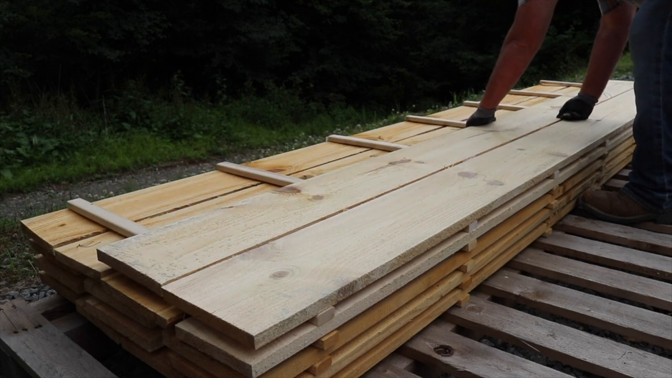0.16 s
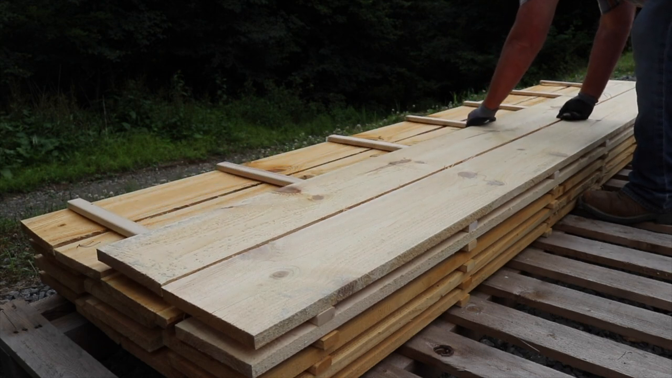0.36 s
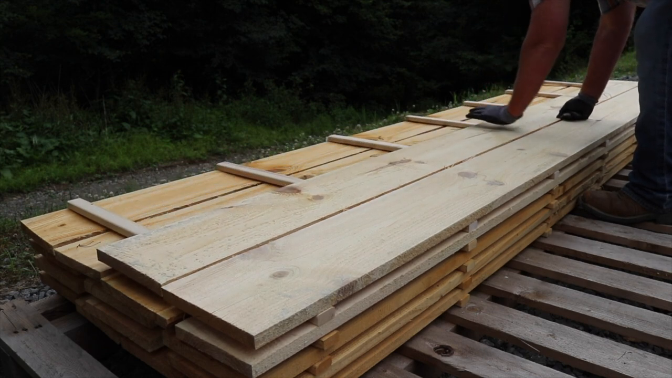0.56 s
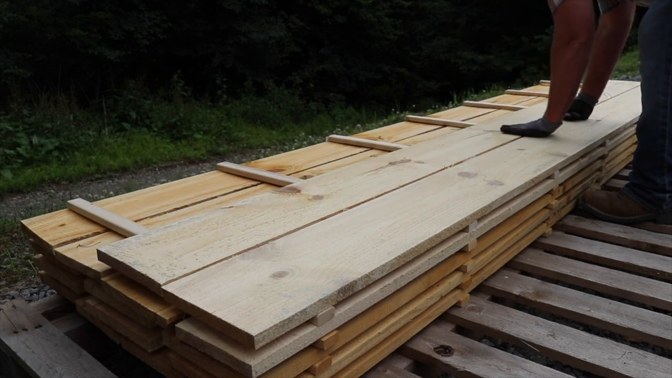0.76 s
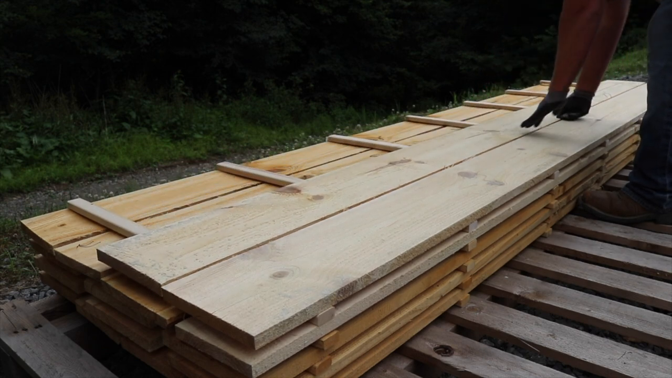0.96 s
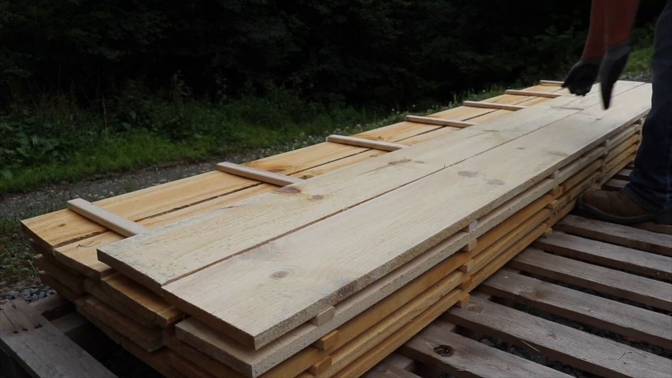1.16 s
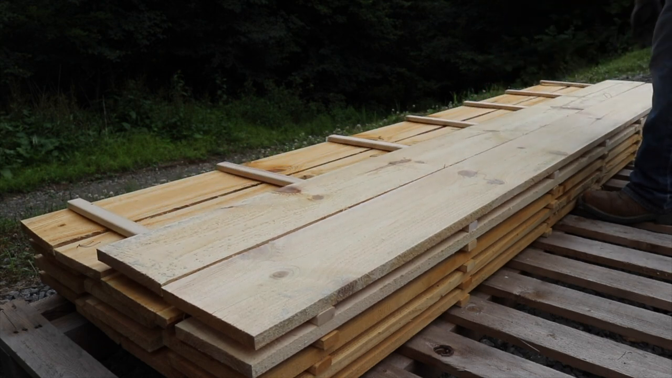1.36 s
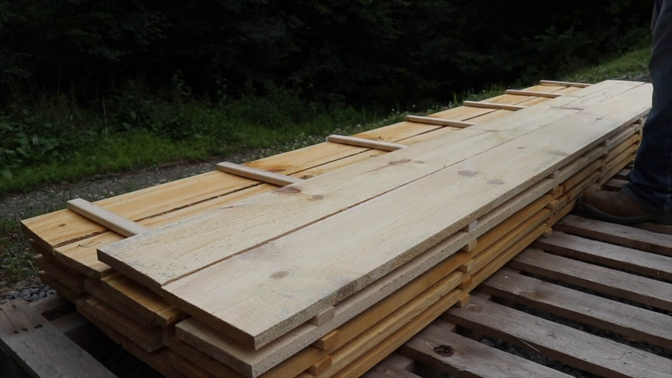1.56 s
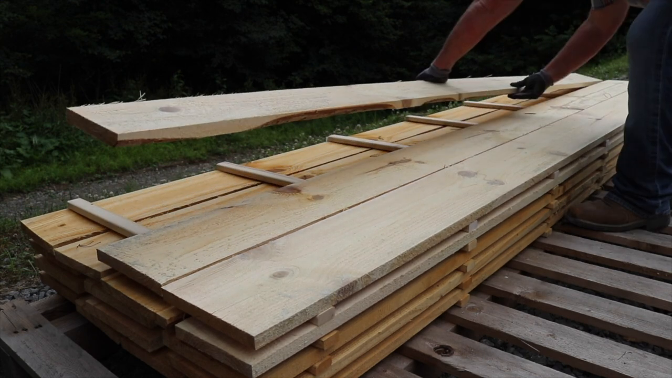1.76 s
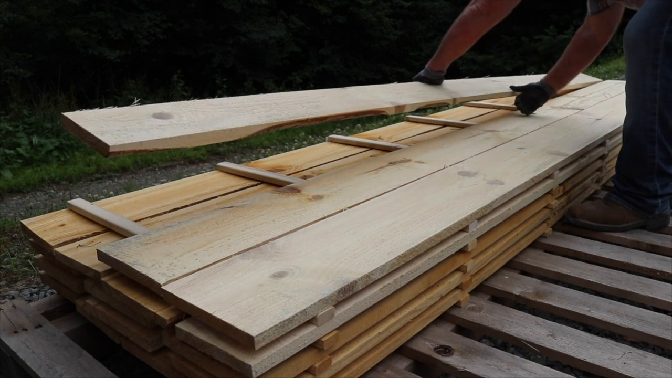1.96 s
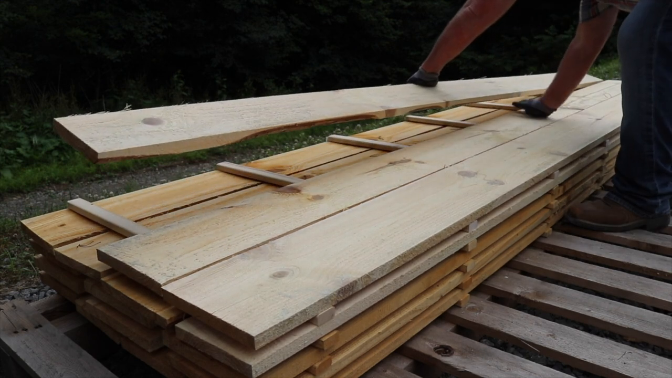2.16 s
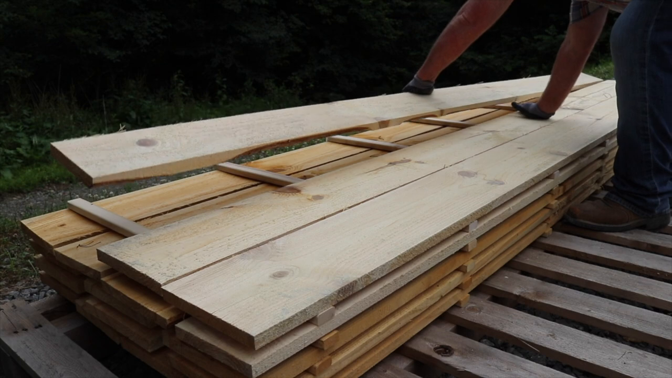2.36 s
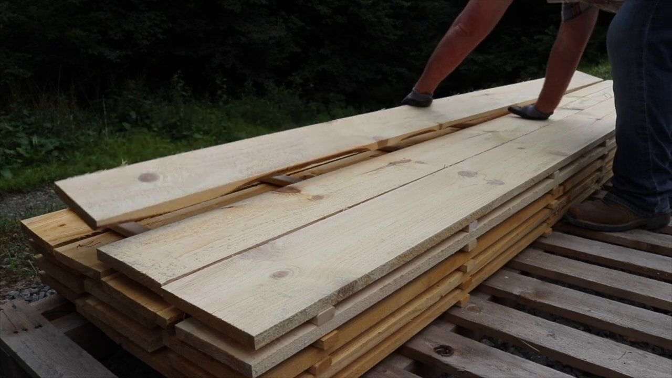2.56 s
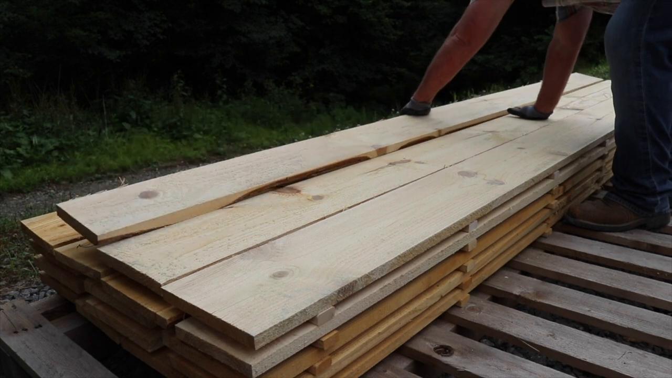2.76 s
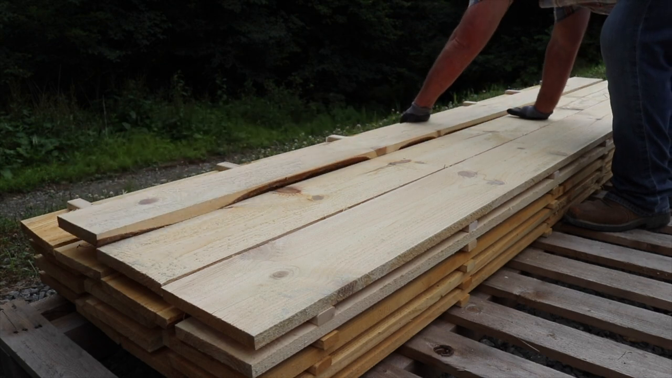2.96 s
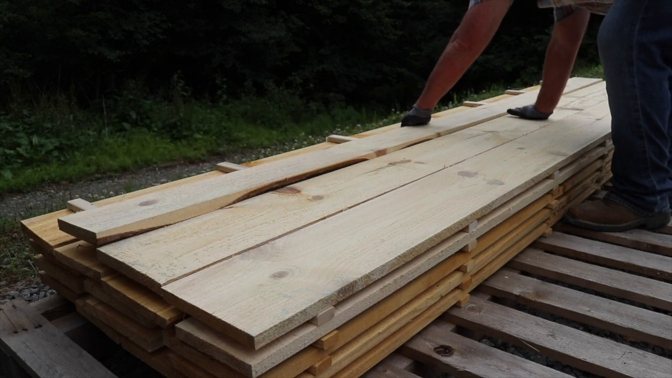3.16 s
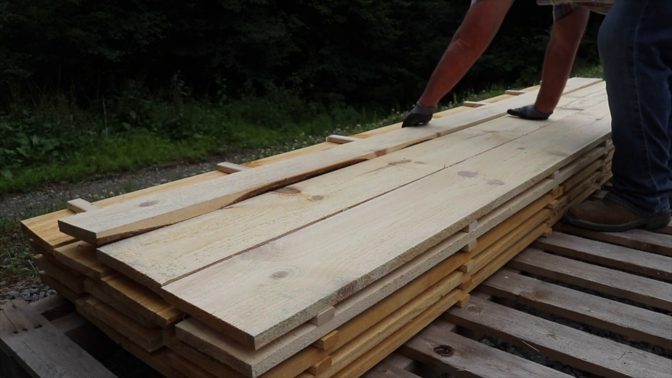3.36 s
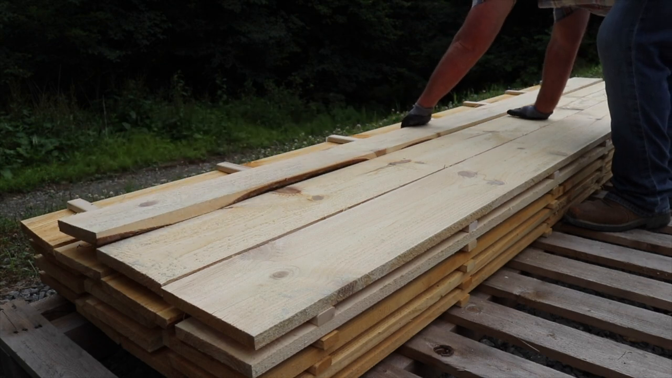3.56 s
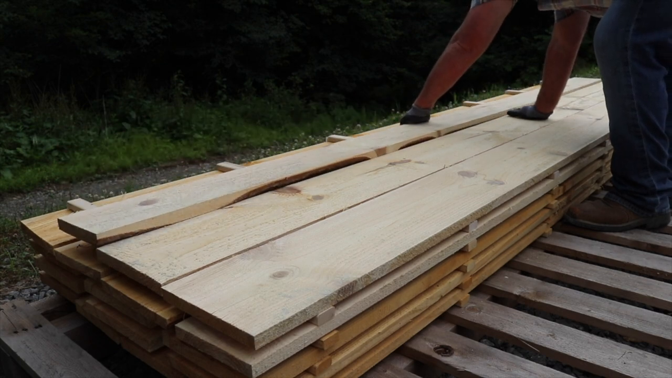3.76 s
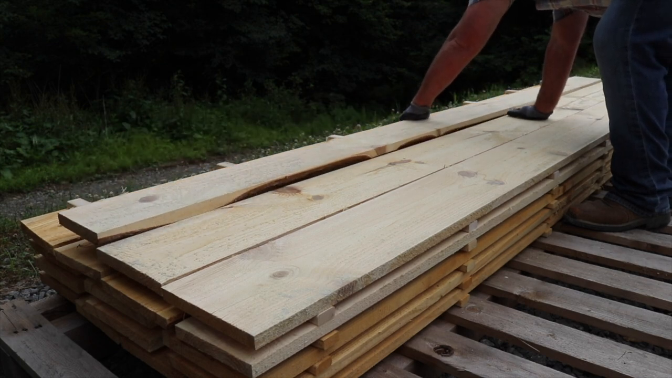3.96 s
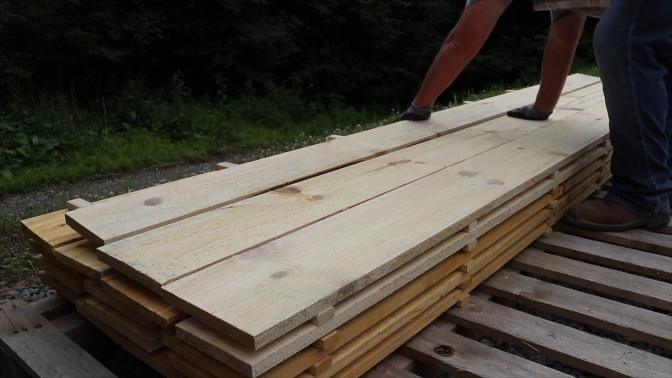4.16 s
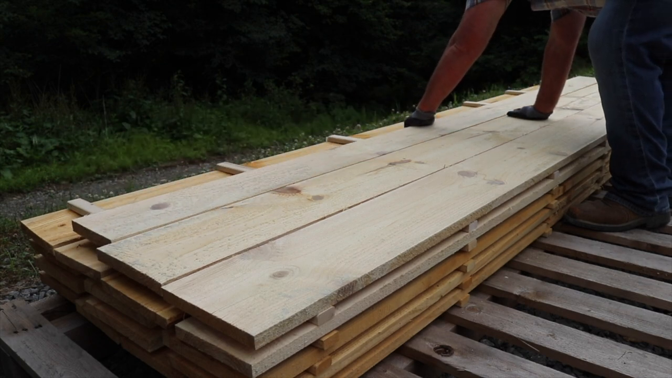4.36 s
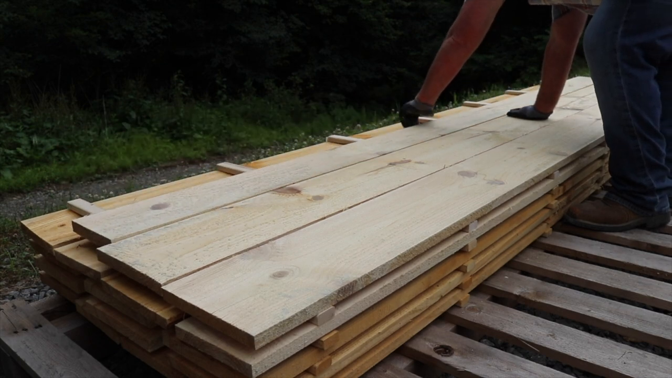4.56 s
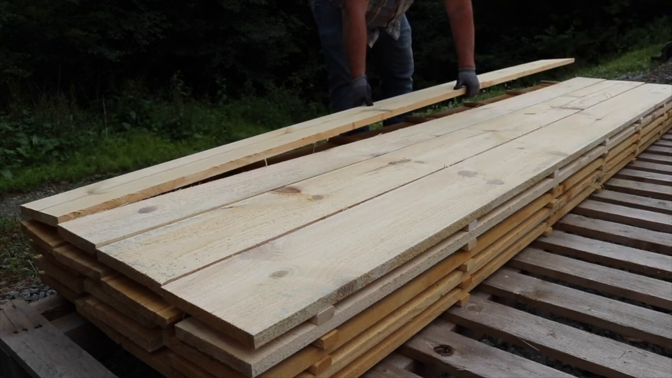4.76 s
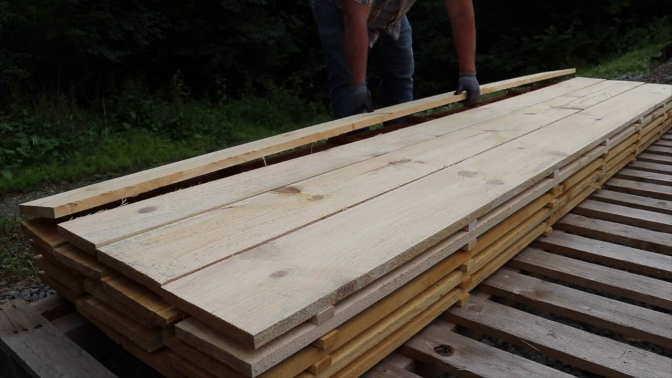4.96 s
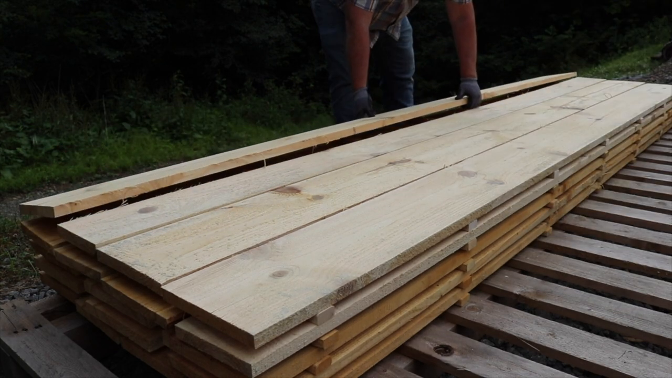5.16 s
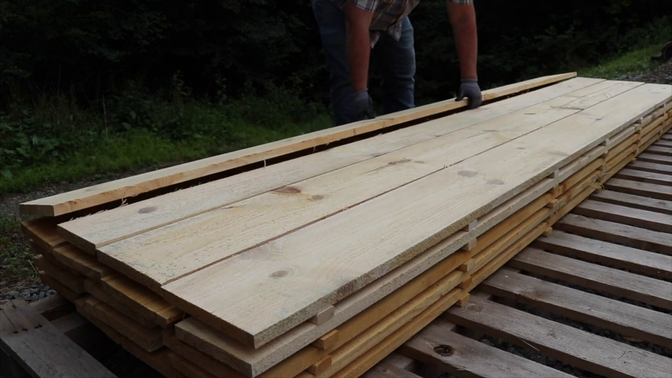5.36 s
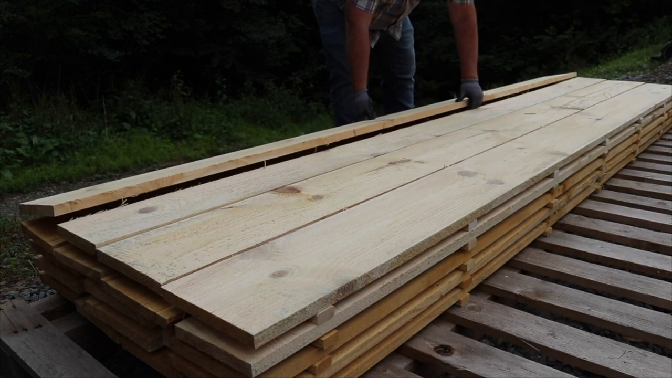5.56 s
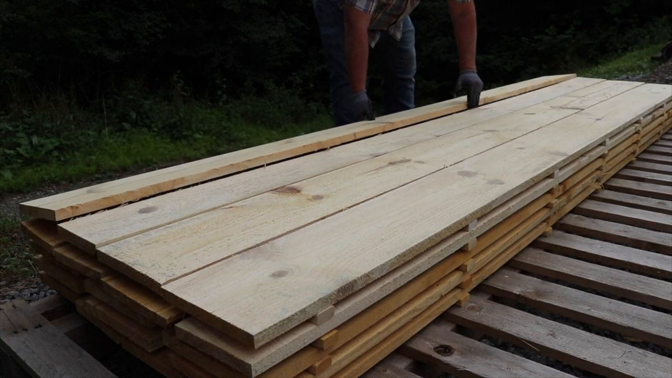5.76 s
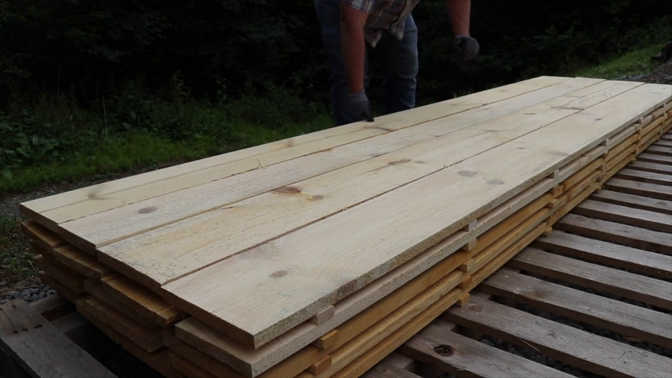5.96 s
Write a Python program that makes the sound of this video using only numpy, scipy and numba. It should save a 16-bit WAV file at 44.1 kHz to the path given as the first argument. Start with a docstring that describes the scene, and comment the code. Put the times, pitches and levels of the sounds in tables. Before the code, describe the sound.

Planks thud and scrape onto a wood stack, the last slapping down loudly, over a faint low hum and distant bird.

```python
"""Outdoors at a lumber pile, a stereo microphone pair facing the stack. Sawn boards are laid on it:
gloves brush the wood, a plank thuds onto the spacer strips, ticks and scrapes as it is pushed home,
and a last narrow board drops flat with a loud clack that makes the recorder's gain control duck.
Each blow rings the modes of board and stack; each scrape is wood fibres catching and slipping.
Far off in the trees a bird sings, and a distant hum wavers over the low rumble of the air."""
import sys
import numpy as np
from scipy import signal
from scipy.fft import rfft, irfft, next_fast_len
from scipy.io import wavfile
from scipy.ndimage import uniform_filter1d
from numba import njit

SR = 44100
rng = np.random.default_rng(int(sys.argv[2]) if len(sys.argv) > 2 else 0)


def transcribe(signal):
    """Save signal, clipped to [-1, 1], as a 16-bit WAV file at the path in sys.argv[1]."""
    frames = np.atleast_2d(signal).T
    limited = np.clip(frames, -1, 1)
    pcm = np.round(limited * 32767).astype(np.int16)
    wavfile.write(sys.argv[1], SR, pcm)


N = 265108
TIME = np.arange(N) / SR


# Board hits board, centre front (time [s], strength [dB], band bottom [Hz], bandwidth [Hz],
# ring time [factor], crack level [dB], bending-wave travel time at 1 kHz [s])
CLACKS = [(5.1015, -10, 830, 580, 0.52, -20.5, 0.0042), (5.721, -45, 890, 3570, 0.56, -20.5, 0.0011),
          (5.77, -15, 600, 1570, 0.18, -43, 0.00061), (5.848, 1, 715, 870, 0.4, -17.5, 0.0038),
          (5.909, 18.5, 153, 2750, 1.17, -2.5, .00052), (5.9205, 19, 700, 810, 0.69, -44, 0.00089)]
def clacks(stack_db=-17):
    """A hard contact cracks and rings the loose board far more than the stack."""
    out = np.zeros(N)
    for s, db, low_hz, width_hz, ring_scale, crack_db, travel_s in CLACKS:
        add(out, s, strike(db + stack_db, db, [low_hz, low_hz + width_hz], ring_scale, travel_s))
        add(out, s + travel_s, crack(crack_db))
    return out


# A plank comes down on the stack (time [s], thud strength [dB], thud band top [Hz],
# knock strength [dB], knock band centre [Hz], knock lag [s], skid level [dB])
LANDINGS = [(1.556, -37, 400, -24.5, 467, 0.0026, -51), (1.668, -22, 296, -12.5, 490, 0.0008, -41),
            (2.714, -10.5, 455, -16.5, 754, .004, -38), (4.209, -10, 1120, -3, 807, .009, -36),
            (4.37, -17, 267, -23.5, 710, 0.0021, -47), (5.107, -21, 501, -14.5, 500, 0.0016, -52)]
def landings(plank_db=-8.5, travel_s=.00098, knock_octaves=.58, bounce_s=.05, bounce_db=-15.5):
    """The stack thuds; the plank knocks as it falls flat, skids a little, sags and hits once more."""
    out, half_band = np.zeros(N), 2 ** (knock_octaves / 2)
    for s, thud_db, top_hz, knock_db, knock_hz, lag_s, skid_db in LANDINGS:
        force_db = 20 * np.log10(np.hypot(undb(thud_db), undb(knock_db)))
        thud = (0, thud_db, [152, top_hz])
        knock = (lag_s, knock_db, [knock_hz / half_band, knock_hz * half_band])
        bounce = (bounce_s, force_db + bounce_db, [140, 318])
        for after_s, db, band_hz in (thud, knock, bounce):
            add(out, s + after_s, strike(db, db + plank_db, band_hz, ring_scale=1, travel_s=travel_s))
        add(out, s + travel_s, crack(thud_db - 23.5))
        skid_speed = touch(attack_s=.0078, length_s=.095)
        add(out, s, stroke(skid_speed, skid_db, tilt_db=-3.5, rasp_hz=1880))
    return out


# Modes of the stack, struck through a plank (frequency [Hz], level [dB], t60 [s])
STACK_MODES = [(96, -14, .2), (148, -8, .2), (166, -6, .22), (199, 0, .2), (240, -4, .12), (277, -3, .14),
               (333, 0, .13), (388, -2, .12), (449, -5, .12), (500, -8, .1), (586, -8, .1), (637, -3, .1),
               (734, -4, .08), (777, -8, .09), (837, -9, .08), (934, 0, .06), (1181, -2, .05),
               (1380, -8, .06)]
# Modes of the loose board (frequency [Hz], level [dB], t60 [s])
BOARD_MODES = [(357, -18, .1), (490, -14, .09), (689, -3, .08), (853, -8, .08), (972, -7, .08),
               (1127, -2, .07), (1262, -7, .055), (1342, -7, .06), (1430, -3, .06), (1659, 1, .055),
               (1860, -5, .045), (1935, -2, .045), (2170, -9, .045), (2430, -15, .04), (2660, -11, .04),
               (2900, -11, .035), (3500, -17, .03)]
def strike(stack_db, board_db, band_hz, ring_scale, travel_s, mode_db=-12, clatter_db=2):
    """One contact rings board and stack; its place and softness choose the band that rings."""
    t = np.arange(SR // 2) / SR
    stack = undb(stack_db) * ring(STACK_MODES, t, ring_scale)
    board = undb(board_db) * ring(BOARD_MODES, t, ring_scale)
    weak_modes = (undb(stack_db) + .33 * undb(board_db)) * clatter(t, ring_scale)
    wood = cut(undb(mode_db) * (stack + board) + undb(clatter_db) * weak_modes, band_hz, "band")
    # bending waves speed up with the root of frequency, so the treble arrives first
    return shape(wood, lambda f: np.exp(-4j * np.pi * travel_s * np.sqrt(1000 * f)))


def ring(modes, t, ring_scale):
    """Decaying modes, met with a slightly different strength by each blow."""
    hz, db, t60 = np.transpose(modes)[:, :, None]
    polarity = (-1) ** np.arange(len(modes))[:, None]
    gain = polarity * undb(db + rng.standard_normal(hz.shape))
    decay = undb(-60 * t / (t60 * ring_scale))
    return np.sum(gain * decay * np.sin(2 * np.pi * hz * t), axis=0)


# The stack's crowd of weak modes, by octave (centre [Hz], level [dB], t60 [s])
CLATTER_BANDS = [(150, -21, .17), (300, -22, .14), (600, -26, .12), (1200, -24, .1), (2400, -20, .065),
                 (4800, -23, .045)]
def clatter(t, ring_scale):
    """Modes too dense to tell apart; the treble dies first."""
    out = np.zeros(len(t))
    for hz, db, t60 in CLATTER_BANDS:
        octave = band_noise(len(t), [hz / np.sqrt(2), hz * np.sqrt(2)])
        out += undb(db - 60 * t / (t60 * ring_scale)) * octave
    return out


# Spectrum of wood slapping wood (frequency [Hz], level [dB])
CRACK_COLOUR = [(300, 10.5), (1500, 16.5), (3200, 3.5), (5500, -2), (8000, -16), (11000, -13), (16000, -44)]
def crack(db, decay_s=.003):
    """The short burst of two hard faces meeting."""
    t = np.arange(SR // 10) / SR
    burst = colour(rng.standard_normal(len(t)), CRACK_COLOUR) * np.exp(-t / decay_s)
    return undb(db) * cut(burst, 70, "high")


# Dry wood catching and letting go (time [s], level [dB], pitch [Hz])
TICKS = [(2.087, -47, 3700), (2.232, -38, 1560), (2.241, -37.5, 2200), (2.288, -30, 1980),
         (2.355, -43.5, 1630), (2.962, -31, 1854), (3.503, -28.5, 1870), (3.881, -41.5, 1260),
         (3.894, -40.5, 1940), (4.701, -46.5, 1850)]
def ticks(rise_cycles=3.52, echo_s=.0069, echo_db=-13, tail_db=-17, tail_s=.024):
    """A few cycles of one wood resonance with a snap, a rustle and a reflection; loud ticks are purer."""
    out, t = np.zeros(N), np.arange(SR // 10) / SR
    for s, db, hz in TICKS:
        age = t * hz / rise_cycles
        swell = age ** 2 * np.exp(2 - 2 * age)
        noise = band_noise(len(t), [hz / 2, hz * 1.07])
        tone = undb(db) * swell * np.sin(2 * np.pi * hz * t)
        snap = undb(-29.5 + .38 * db) * swell * noise
        rustle = undb(db + tail_db) * np.exp(-t / tail_s) * noise
        tick = tone + snap + rustle
        add(out, s, tick)
        add(out, s + echo_s, undb(echo_db) * tick)
    return out


def splinter(at_s=1.5657, snap_db=-31, band_hz=(2800, 7000), snap_s=.0012, tear_db=-23, tear_s=.033):
    """A splinter snaps and tears as the plank is lifted."""
    out, t = np.zeros(N), np.arange(SR // 5) / SR
    envelope = np.exp(-t / snap_s) + undb(tear_db) * np.exp(-t / tear_s)
    add(out, at_s, undb(snap_db) * envelope * band_noise(len(t), band_hz, order=1))
    return out


# Shoves along the stack (time of top speed [s], run-up [s], level [dB], tilt [dB/octave], rasp [Hz])
PUSHES = [(.447, .19, -36, -1.6, 2140), (3.305, 0.14, -52, 0, 1800), (4.355, 0.12, -39.5, -0.5, 1400),
          (4.584, 0.13, -34.5, -0.7, 2600), (5.768, 0.09, -33, -2, 1720), (5.868, .06, -26.5, -0.8, 1900)]
def pushes(run_up_power=1.66, stop_s=.039):
    """A board pushed over rough-sawn wood gathers speed and stops dead."""
    out = np.zeros(N)
    for s, run_s, db, tilt_db, rasp_hz in PUSHES:
        t = np.arange(-run_s, stop_s, 1 / SR)
        run_up = np.minimum(1 + t / run_s, 1) ** run_up_power
        brake = np.cos(np.pi / 2 * np.maximum(t, 0) / stop_s) ** 2
        add(out, s - run_s, stroke(run_up * brake, db, tilt_db, rasp_hz))
    return out


# Passing touches at the pile (time [s], length [s], level [dB], tilt [dB/octave], rasp [Hz])
BRUSHES = [(0.796, 0.12, -37.5, 0.8, 950), (.955, 0.12, -50.5, 2.5, 2000), (1.082, 0.086, -40, -1.7, 1960),
           (2.038, .07, -49, 2, 1880), (3.081, .07, -51.5, -1.5, 1200), (4.003, 0.15, -48.5, 1, 1790),
           (4.803, 0.11, -45, -3, 1530), (5.965, .12, -17, -5, 900)]
def brushes(attack_s=.012):
    """Gloves and boards graze the wood briefly."""
    out = np.zeros(N)
    for s, length_s, db, tilt_db, rasp_hz in BRUSHES:
        add(out, s, stroke(touch(attack_s, length_s), db, tilt_db, rasp_hz))
    return out


def touch(attack_s, length_s):
    """Speed of a contact that starts quickly and fades."""
    t = np.arange(0, length_s, 1 / SR)
    return np.sin(np.pi / 2 * np.interp(t, [0, attack_s, length_s], [0, 1, 0])) ** 2


# Tone of rubbing on sawn wood (frequency [Hz], gain [dB])
RUB_COLOUR = [(150, -8.5), (450, -9.5), (700, -2.5), (1200, -3), (1900, -6), (2800, -8.5), (4000, -12),
              (6000, -23), (10000, -28), (16000, -35)]
def stroke(speed, db, tilt_db, rasp_hz, rasp_db=5, rasp_octaves=.74, judder_db=1.4):
    """Juddering friction, as loud as it is fast; the contact favours one band, which gives it its rasp."""
    rub = friction(len(speed))
    rasp = shape(rub, lambda f: undb(rasp_db * np.exp(-(np.log2(f / rasp_hz) / rasp_octaves) ** 2)))
    judder = judder_db * walk(130)[:len(speed)]
    return undb(db + judder) * speed * colour(rasp, RUB_COLOUR, tilt_db)


def friction(size, body_db=-12):
    """Slipping fibres, partly heard through the board's hand-damped modes."""
    slips = grains(size)
    damped_board = ring(BOARD_MODES, np.arange(SR // 10) / SR, ring_scale=.4)
    body = signal.fftconvolve(slips, damped_board)[:size]
    return slips + undb(body_db) * unit(body)


def grains(size, grain_db=3):
    """Fibres catch and slip in dense uneven grains."""
    slips = rng.standard_normal(size) * (rng.random(size) < .5)
    strength = undb(grain_db * np.minimum(rng.exponential(size=size), 4))
    return unit(slips * strength)


# Quiet movement at the pile (time [s], level [dB])
SHUFFLE_LEVEL = [(0.0, -54), (1.65, -49), (1.87, -53), (2.54, -81), (2.95, -54.5), (3.41, -68.5),
                 (3.94, -51.5), (4.11, -45.5), (4.22, -47.5), (4.43, -44.5), (4.6, -61), (5.7, -55.5)]
# Its spectrum (frequency [Hz], level [dB])
SHUFFLE_COLOUR = [(200, 9.5), (500, -1.5), (1100, 8.5), (1800, 1), (3000, -11), (4500, -21), (8000, -26),
                  (16000, -33)]
def shuffle():
    """Slow shuffling and sliding between the blows."""
    return colour(grains(N), SHUFFLE_COLOUR) * undb(curve(SHUFFLE_LEVEL) + walk(25))


# A songbird far off in the trees (time [s], length [s], first pitch [Hz], last pitch [Hz], level [dB])
BIRD_PHRASES = [(.48, .2, 3000, 3000, -54), (1.33, .22, 3050, 2850, -57.5), (1.82, .36, 3100, 3900, -59),
                (2.77, .4, 2700, 2600, -56), (3.53, .35, 2300, 3050, -55.5), (4.86, .18, 2700, 3150, -56),
                (5.5, .2, 3100, 2300, -57.5)]
def bird(syllable_s=.09, step_s=.06, warble=.07, spread=.09, slide=.3):
    """Phrases of warbled whistles that slide up and down in turn."""
    out, waver = np.zeros(N), 1 + warble * walk(200)
    progress = np.linspace(0, 1, int(syllable_s * SR))
    arch = 2 * np.sqrt(progress * (1 - progress))
    for start, length_s, first_hz, last_hz, db in BIRD_PHRASES:
        for k, s in enumerate(np.arange(start, start + length_s - syllable_s / 2, step_s)):
            centre_hz = first_hz + (last_hz - first_hz) * (s - start) / length_s
            glide = 1 + spread * rng.standard_normal() + (-1) ** k * slide * (progress - .5)
            hz = centre_hz * glide * np.interp(s + progress * syllable_s, TIME, waver)
            add(out, s, undb(db) * arch * np.sin(2 * np.pi * np.cumsum(hz) / SR))
    return out


def through_trees(song, decay_s=.05, direct_db=-8, scattered_db=-2):
    """From this far, more sound reaches the microphones scattered by the trees than directly."""
    t = np.arange(SR // 2) / SR
    echoes = rng.standard_normal(len(t)) * np.exp(-t / decay_s)
    scattered = signal.fftconvolve(song, echoes / np.linalg.norm(echoes))[:N]
    return undb(direct_db) * song + undb(scattered_db) * scattered


# A distant hum, as it reaches the microphones (time [s], level [dB])
HUM_LEVEL = [(0, -58), (.11, -36.5), (.42, -40), (.6, -45), (1.9, -47), (2.55, -61), (3.05, -47.5),
             (4, -45), (4.9, -57.5)]
# Its pitch, which steps up and later sinks back (time [s], pitch [Hz])
HUM_PITCH = [(0, 111), (.95, 108), (1.6, 114.8), (1.8, 125.7), (4.3, 122.3), (6, 111)]
def hum(waver=.0154, flutter_db=2):
    """One low tone, unsteady in pitch and level."""
    hz = curve(HUM_PITCH) * (1 + waver * walk(12))
    tone = unit(np.sin(2 * np.pi * np.cumsum(hz) / SR))
    return tone * undb(curve(HUM_LEVEL) + flutter_db * walk(43))


# Open air around the pile (frequency [Hz], level [dB])
AIR_COLOUR = [(25, -34), (50, 2), (80, 3.5), (130, 5), (190, -3.5), (280, -14.5), (500, -14.5), (1200, -17),
              (3000, -27), (6000, -36), (11000, -36), (16000, -37)]
def air(db=-45):
    """A steady low outdoor rumble."""
    return undb(db) * colour(rng.standard_normal(N), AIR_COLOUR)


def undb(db):
    """Decibels to gain."""
    return 10 ** (np.asarray(db) / 20)


def unit(x):
    """Scale to rms 1."""
    return x / np.sqrt(np.mean(x ** 2))


def shape(x, response):
    """Filter by a gain that is a function of frequency."""
    size = next_fast_len(len(x))
    hz = np.maximum(np.arange(size // 2 + 1) * SR / size, 1)
    return irfft(rfft(x, size) * response(hz), size)[..., :len(x)]


def colour(x, points, tilt_db=0):
    """Filter by (Hz, dB) points, tilted per octave; rms 1."""
    hz, db = np.transpose(points)
    return unit(shape(x, lambda f: undb(np.interp(np.log(f), np.log(hz), db) + tilt_db * np.log2(f))))


def cut(x, hz, kind, order=2):
    """Causal low-, high- or band-pass."""
    return signal.sosfilt(signal.butter(order, hz, kind, fs=SR, output="sos"), x)


def band_noise(size, band_hz, order=2):
    """Band-passed noise of rms 1."""
    return unit(cut(rng.standard_normal(size), band_hz, "band", order))


def curve(points):
    """Join (time, value) points across the scene."""
    return np.interp(TIME, *np.transpose(points))


def walk(rate_hz):
    """Smooth random drift of rms 1."""
    size = int(SR / rate_hz)
    steps = np.repeat(rng.standard_normal(N // size + 1), size)
    return unit(uniform_filter1d(steps, size)[:N])


def add(out, s, x):
    """Mix x in from time s on."""
    i = int(s * SR)
    out[i:i + len(x)] += x[:N - i]


@njit
def follow(x, attack, release):
    """Envelope that rises fast and falls slowly."""
    out, level = np.empty(len(x)), 0.
    for i in range(len(x)):
        level += (x[i] - level) * (attack if x[i] > level else release)
        out[i] = level
    return out


def scene(apart_hz=15000, hiss_db=-63):
    """The pile is centred; only its top treble reaches the two hissing microphones out of phase."""
    wood = landings() + clacks() + ticks() + splinter() + shuffle() + pushes() + brushes()
    side = shape(wood, lambda f: 1j * (f / apart_hz) ** 2)
    background = through_trees(bird()) + hum() + air()
    hiss = undb(hiss_db) * rng.standard_normal((2, N))
    return np.array([wood + side, wood - side]) + background + hiss


def record(dry, limit_db=-5, attack_s=.00073, release_s=.81, top_hz=15900):
    """Gain control ducks under the loudest blow, too late to keep its first cycles from clipping."""
    envelope = follow(np.abs(dry[0]), 1 / (attack_s * SR), 1 / (release_s * SR))
    ducked = dry / np.maximum(envelope / undb(limit_db), 1)
    low_pass = signal.ellip(8, .2, 60, top_hz, fs=SR, output="sos")
    return signal.sosfilt(low_pass, np.clip(ducked, -1, 1))


dry = scene()
out = record(dry)
transcribe(out)
```